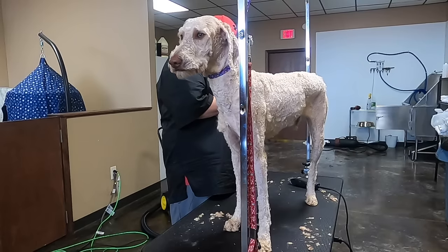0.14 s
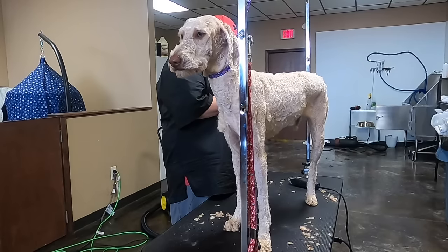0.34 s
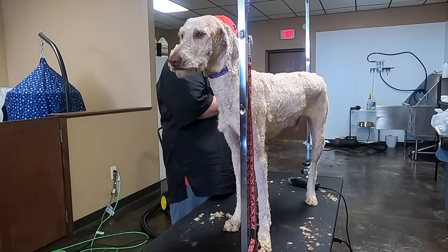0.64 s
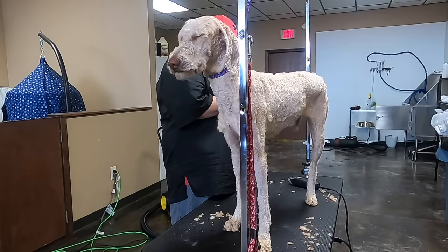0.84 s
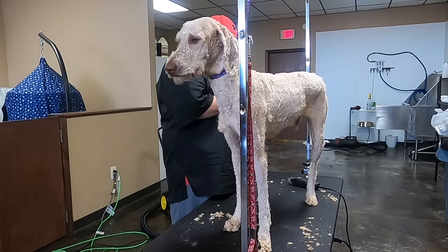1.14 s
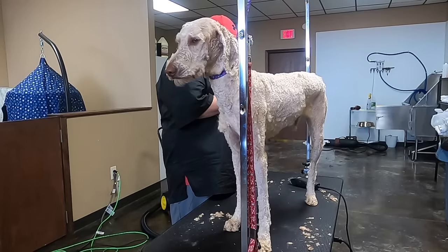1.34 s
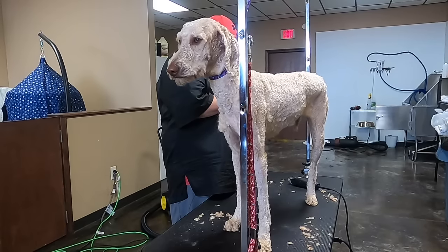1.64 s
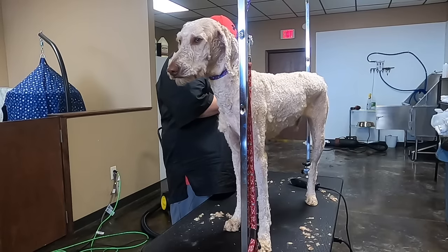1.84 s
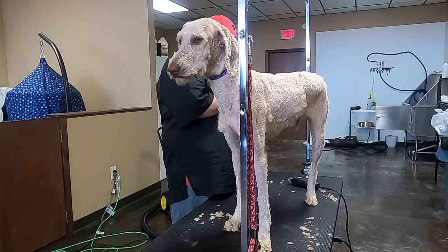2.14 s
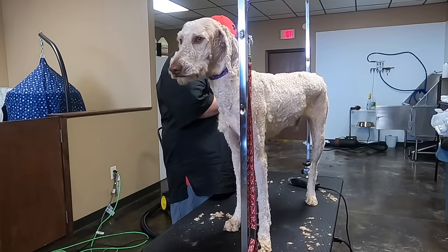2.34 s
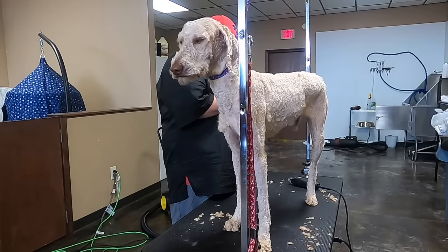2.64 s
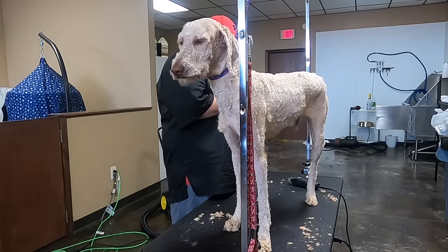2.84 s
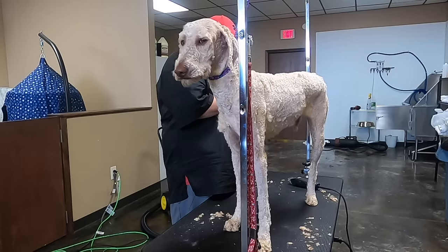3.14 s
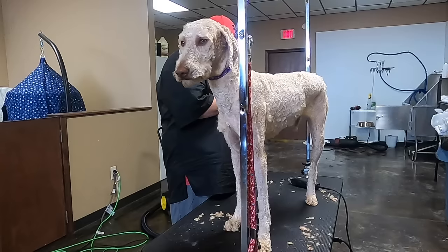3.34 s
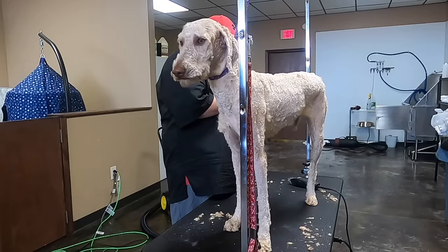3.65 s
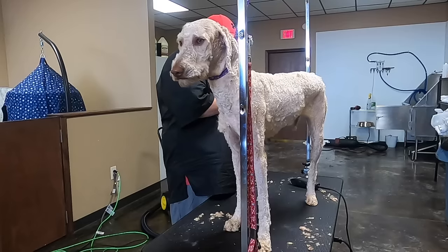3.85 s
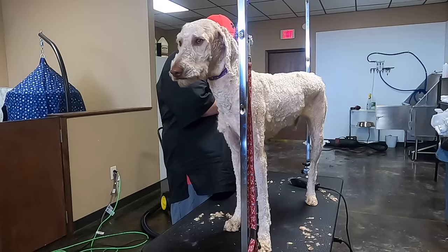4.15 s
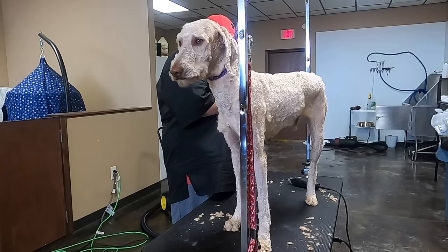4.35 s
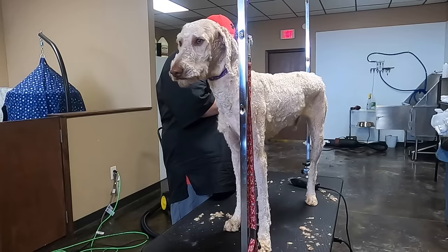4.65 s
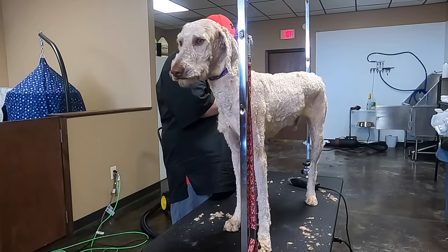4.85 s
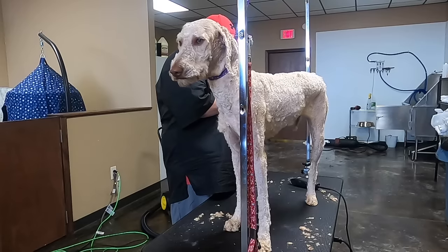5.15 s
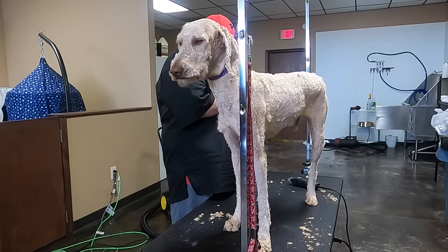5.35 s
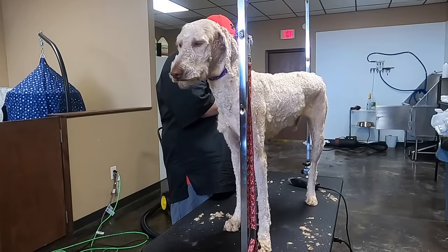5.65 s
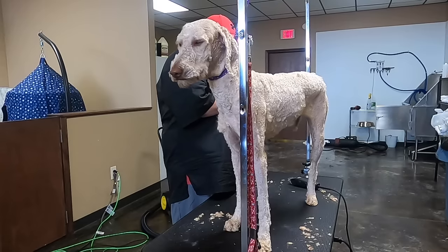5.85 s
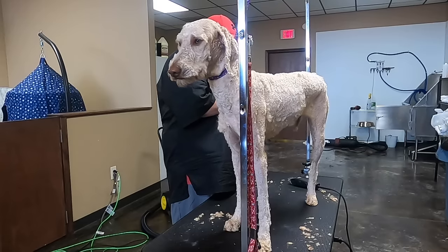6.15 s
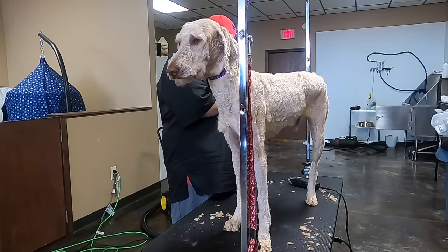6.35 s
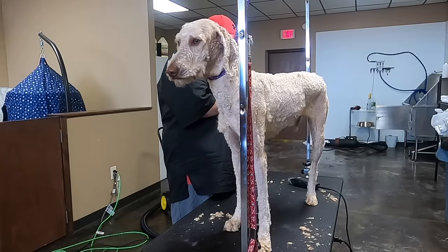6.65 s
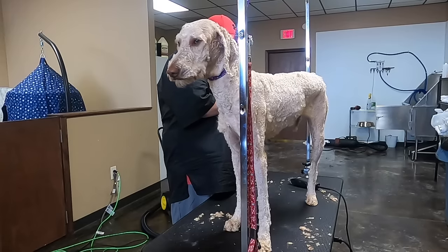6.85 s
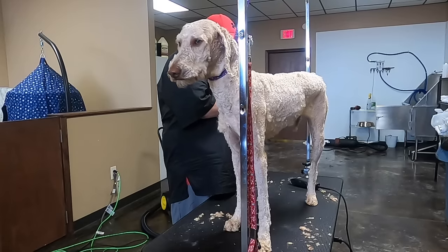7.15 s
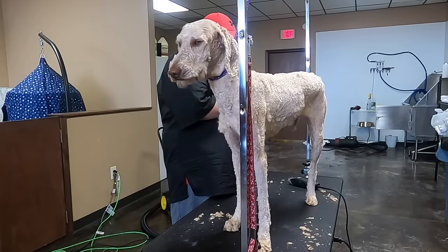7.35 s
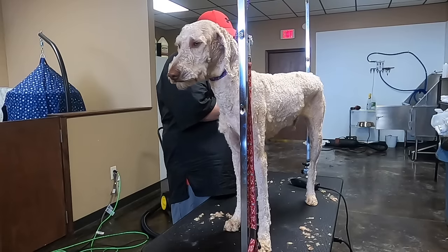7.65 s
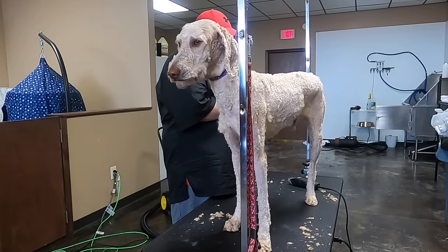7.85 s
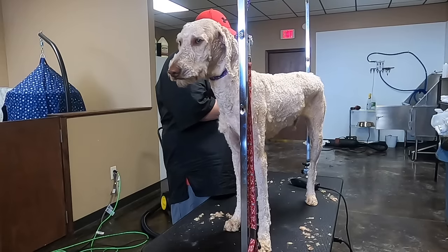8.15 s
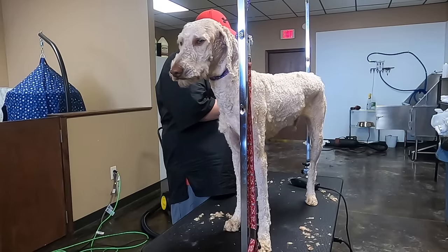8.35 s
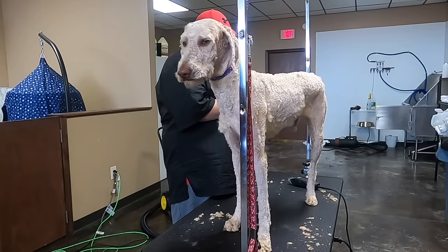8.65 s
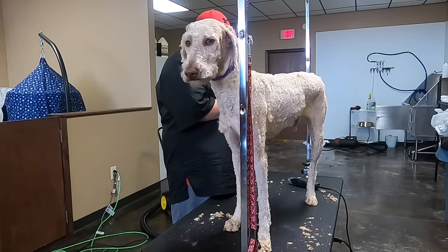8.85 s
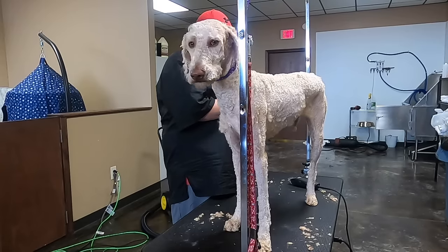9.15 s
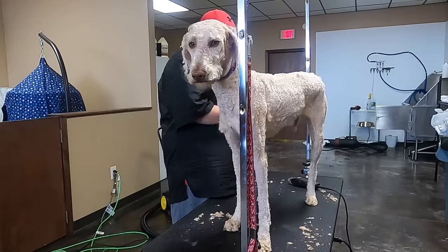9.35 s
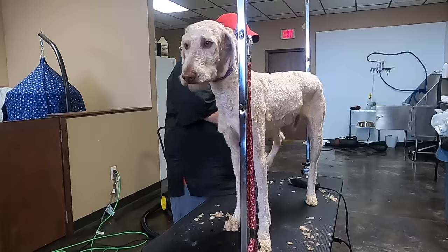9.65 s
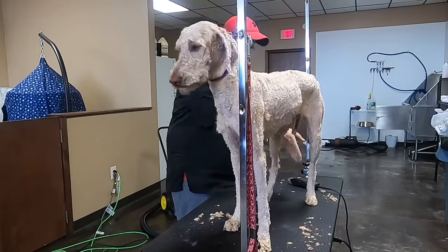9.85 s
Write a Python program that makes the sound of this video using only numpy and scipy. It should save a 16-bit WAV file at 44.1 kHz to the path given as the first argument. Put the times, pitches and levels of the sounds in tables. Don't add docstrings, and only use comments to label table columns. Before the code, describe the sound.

In a hard-floored grooming room, a low ventilation rumble and mains hum throb steadily. A few metres from the stereo microphone, steel clippers cut a dog's nails: tiny creaks, then a sharp crack with short metallic ring, a soft table thud and brief room echo. Six snips come at uneven gaps, one much softer. Small latch ticks fall between them, and sleeve and fur rustle near the end.

```python
import sys
import numpy as np
from scipy import signal
from scipy.io import wavfile
from scipy.ndimage import uniform_filter1d

SR = 44100
rng = np.random.default_rng(int(sys.argv[2]) if len(sys.argv) > 2 else 0)


def dump(signal):
    limited = np.clip(np.atleast_2d(signal).T, -1, 1)
    pcm = np.round(limited * 32767).astype(np.int16)
    wavfile.write(sys.argv[1], SR, pcm)


def boost(x):
    u = np.asarray(x, float) / 20
    return 10 ** u


N = 441000

# (frequency [Hz], density [dB per Hz])
RUMBLE_COLOUR = [(18, -17.5), (27, -0.5), (36, -1), (50, -7), (64, -4.5), (80, -11.5), (100, -11.5),
                 (140, -13.5), (185, -4.5), (212, -10.5), (232, -5.5), (246, -8.5), (262, -8.5),
                 (310, -9.5)]
# (frequency [Hz], density [dB per Hz])
AIR_COLOUR = [(180, -34), (310, -1), (364, -7.5), (420, -14.5), (458, -10), (620, -25), (722, -22),
              (817, -27), (1030, -24.5), (1120, -23.5), (1630, -29.5), (3000, -43.5), (3900, -74),
              (6600, -120)]
# (frequency [Hz], density [dB per Hz])
HISS_COLOUR = [(1500, -7.5), (3000, 4), (5000, -2.5), (8000, -7), (8500, -13.5), (11000, -19),
               (13200, -17.5), (13600, -37.5), (16000, -32.5)]
RUMBLE_DB, AIR_DB, HISS_DB = -52, -59, -81

# (base frequency [Hz], moment it meets the mains phase [s])
MAINS = (120.025, 0)
COMPRESSOR = (59.05, .322)
FAN = (128.675, .339)
MAINS_HZ = 120.025
MAINS_ORDERS = [1, 2, 3]
COMPRESSOR_ORDERS = [1, 2, 4, 6, 9, 10, 11, 12]
FAN_ORDERS = [1, 2]
MAINS_DB = [-54.5, -65.5, -78.5]
COMPRESSOR_DB = [-58.5, -57, -78, -80, -85, -78, -80, -81.5]
FAN_DB = [-58, -71]
FAR_HZ = [107.78, 96.5, 160.83]
FAR_DB = [-67.5, -82, -83]
# (frequency [Hz], width [Hz], rms level [dB])
WAVERING = [(194.7, 0.28, -59), (689, 16, -94), (1660, 14, -86), (8050, 10, -108), (13216, 32, -118)]

# (start [s], length [s], level [dB], centre [Hz])
RUBS = [
    (1.627, 0.1, -70.5, 1700),
    (2.444, 0.5, -79, 4300),
    (4.248, 0.23, -71.5, 1450),
    (7.06, .14, -79.5, 5000),
    (9.347, 0.16, -66.5, 1600),
    (9.45, 0.46, -68, 1600),
    (9.719, .45, -58.5, 2400),
]
RUB_RISE, RUB_ENDS_DB = .35, -8
# (time [s], level [dB], centre [Hz], length [s])
CRUMPLES = [(1.655, -72.5, 2980, 0.017), (4.284, -71.5, 2500, 0.058), (9.766, -62, 3500, 0.0045),
            (9.775, -58, 3000, .008), (9.784, -52.5, 3200, .006), (9.846, -50, 2300, .014),
            (9.862, -50, 2010, 0.007), (9.873, -49.5, 2470, .02), (9.898, -57, 3400, 0.0098),
            (9.906, -60, 6000, 0.021), (9.914, -49.5, 3000, .012), (9.925, -49.5, 2056, 0.019),
            (9.963, -52, 1680, 0.014), (9.971, -53.5, 1100, .01), (9.997, -62, 7000, .01)]
# (frequency [Hz], gain [dB])
CLOTH_DULLING = [(4000, 1.5), (8000, -5), (11000, -10.5), (16000, -20)]

# (time [s], peak [dB], pitch [Hz], ring [dB], brightness [dB])
TICKS = [(0.2134, -57, 2050, -5, -8), (1.7408, -57.5, 2500, -4, -14), (4.0444, -69, 1730, -6, 10),
         (4.1063, -49, 2100, -6, -6), (4.6638, -58, 1610, -8, -5), (5.9678, -37.5, 1750, -4, -0.5),
         (6.108, -50.5, 2650, -7.5, -1), (7.1734, -60, 1525, -12.5, 5), (7.2913, -39.5, 1500, -7.5, -8),
         (9.3811, -49, 1880, -17, -1), (9.5013, -59, 1730, 2, 9), (9.816, -45, 2000, -7, -10),
         (9.8723, -36, 2660, -8, -16)]
# (time [s], peak [dB], pitch [Hz], ring [dB],
# brightness [dB])
BITE_PINGS = [
    (6.534, -69, 7860, 3, 6),
    (6.541, -50, 8000, -8, 11),
    (6.551, -71, 7700, -1, 6),
]
# (frequency [Hz], gain [dB])
TICK_COLOUR = [(700, -28.5), (1300, -1.5), (2500, -2.5), (4500, -1.5), (6500, -4), (8200, -8.5),
               (10000, -20), (13000, -35.5), (16000, -52)]

# (time [s], peak [dB], handle ring [dB], jaw ring [dB], blade crack [dB])
SNIPS = [
    (1.1476, -24.5, -3.5, -9, 2.5),
    (2.361, -41.5, -19, -33, -25),
    (3.402, -27, -5, -11.5, -2.5),
    (5.3156, -24, -7, -13.5, -2),
    (6.6164, -25, -5.5, -11, 4),
    (8.929, -23, -0.5, -12.5, -1),
]
# (time [s], peak [dB], handle ring [dB], jaw ring [dB])
BITES = [(1.121, -60, -11, -11), (1.127, -45.5, -5, -16), (2.328, -65, -3, -5), (2.334, -65, -8, -15),
         (2.349, -50, -5, -9), (2.356, -55, 2.5, 0.5), (3.351, -59, -7.5, -13.5), (3.357, -63, -2.5, -14.5),
         (3.38, -49.5, -5, -14), (3.394, -49, 0, -7), (5.27, -61.5, -10.5, -2), (5.304, -59, -3, -9),
         (6.587, -53, -8, -14), (6.597, -64, 6, -20), (8.876, -71, -8, -5), (8.913, -54.5, -3, -8),
         (8.918, -54, -7, -12), (8.9253, -31, -9, -8)]
BITE_BLADE_DB = -3.5
# (frequency [Hz], gain [dB])
NAIL_CRACK = [(500, -40.5), (900, -26.5), (1400, -11.5), (1900, -3), (2700, -3.5), (3600, 2.5), (4700, -1),
              (5800, -4.5), (7000, -8), (9500, -21), (12300, -27.5), (15000, -42), (16500, -50.5)]
# (frequency [Hz], t60 [s], level [dB])
HANDLE = [(1620, .013, -3.5), (1850, .017, 0), (2150, .013, -8)]
JAW = [(3350, .014, 0), (3620, .015, -3)]
BLADE = [(2250, .012, -9), (5550, .01, -9)]
TABLE = [(309.6, 0.046, 3), (520, 0.026, 7.5), (700, 0.036, -3), (906, 0.023, -2)]
THUD_DB, THUD_FOLLOWS = -34.5, .6

# (delay [s], left level [dB], right level [dB])
EARLY = [(.0046, -5, -5), (.0063, -6, -6), (.0115, -9, -10), (.0168, -8, -8), (.021, -11, -11),
         (.034, -11, -12)]
# (frequency [Hz], t60 [s])
ROOM_T60 = [(250, 0.25), (500, 0.53), (900, 0.41), (1800, 0.37), (3600, 0.5), (5600, 0.49), (8000, 0.38),
            (12000, 0.31)]
# (frequency [Hz], gain [dB])
ROOM_COLOUR = [(300, -2.5), (1000, 3), (2000, 0), (4000, 1.5), (8000, 4), (14000, -6)]
# (frequency [Hz], correlation [1])
NOISE_LIKENESS = [(25, .96), (60, .96), (130, .97), (290, .94), (640, .8), (1410, .55), (3100, .25),
                  (6800, 0)]
# (frequency [Hz], correlation [1])
ECHO_LIKENESS = [(300, 0.92), (1000, 0.54), (2000, 0.74), (4000, 0.12), (8000, 0.11)]
# (frequency [Hz], difference [dB])
LEAN = [(1000, -.5), (2500, 1), (5000, -.5), (8000, -4.5), (11000, -4.5), (14000, -2.5)]
LAG_S = 2 / 44100


def evened(x):
    return x / np.sqrt(np.mean(x ** 2) + 1e-20)


def read(points, hz):
    f, value = np.transpose(points)
    return np.interp(np.log(hz + 1), np.log(f + 1), value)


def add(mix, s, sound):
    part = mix[int(round(s * SR)):][:len(sound)]
    part += sound[:len(part)]


def resonate(x, hz, width):
    turn = np.exp(2j * np.pi * np.cumsum(hz * np.ones(len(x))) / SR)
    r = np.exp(-np.pi * width / SR)
    smoothed = signal.lfilter([1 - r], [1, -r], x / turn)
    return 2 * (turn * smoothed).real


def click(gain_db):
    hz = abs(np.fft.fftfreq(1024, 1 / SR))
    level = np.log(boost(np.maximum(gain_db(hz), -100)))
    return np.fft.ifft(np.exp(np.conj(signal.hilbert(level)))).real[:512]


def ports(left, other, hz, likeness):
    same = np.clip(read(likeness, hz), 0, 1)[:, None]
    late = np.exp(-2j * np.pi * hz * LAG_S)[:, None]
    right = same * left + np.sqrt(1 - same ** 2) * other
    return np.array([left * late, right])


def wash(shape, size, top_hz, patchy_db):
    hz = np.arange(0, top_hz, SR / size)
    a, b, c, d, patches = rng.standard_normal((N * 4 // size + 5, len(hz), 5)).T
    patches = uniform_filter1d(patches, size=6, axis=0)
    patches = evened(uniform_filter1d(patches, size=6, axis=1))
    z = ports(a + 1j * b, c + 1j * d, hz, NOISE_LIKENESS)
    z = z * boost(shape(hz)[:, None] + patchy_db * patches)
    z = np.pad(z, ((0, 0), (0, size // 2 + 1 - len(hz)), (0, 0)))
    noise = signal.istft(z, nperseg=size, noverlap=size * 3 // 4)[1]
    return evened(noise[:, :N])


def background_noise():
    edge = RUMBLE_COLOUR[-1][0]
    rumble = wash(lambda hz: read(RUMBLE_COLOUR, hz) - 90 * (hz < 14), size=4096, top_hz=edge, patchy_db=2.5)
    air = wash(lambda hz: read(AIR_COLOUR, hz) - 90 * (hz <= edge), size=2048, top_hz=3014, patchy_db=1.84)
    hiss = wash(lambda hz: read(HISS_COLOUR, hz) - 90 * (hz < 1500), size=1024, top_hz=15430, patchy_db=1.3)
    return boost(RUMBLE_DB) * rumble + boost(AIR_DB) * air + boost(HISS_DB) * hiss


def machines():
    t = np.arange(N) / SR
    apart = np.array([[-.11], [.11]])
    hum = np.zeros((2, N))
    for hz, db in zip(FAR_HZ, FAR_DB):
        hum += boost(db) * np.cos(2 * np.pi * (hz * t + rng.random()) + apart)
    for (base, s), orders, levels in [(MAINS, MAINS_ORDERS, MAINS_DB),
                                      (COMPRESSOR, COMPRESSOR_ORDERS, COMPRESSOR_DB),
                                      (FAN, FAN_ORDERS, FAN_DB)]:
        for k, db in zip(orders, levels):
            free_phase = rng.random() * (db < max(levels))
            turns = k * base * (t - s) + MAINS_HZ * s + free_phase
            hum += boost(db) * np.cos(2 * np.pi * turns + apart)
    wavering = np.zeros(N)
    for hz, width, db in WAVERING:
        wavering += boost(db) * evened(resonate(rng.standard_normal(N), hz, width))
    return np.sqrt(2) * hum + wavering


def slips(count, hz, width):
    u, e, sign = rng.random((count, 3)).T
    happens = u < 4500 / SR
    grains = happens * boost(-3.5 * np.log(e + .005)) * np.sign(sign - .5)
    return evened(resonate(resonate(grains, hz, width), hz, width))


def cloth():
    out = np.zeros(N)
    for s, length_s, db, hz in RUBS:
        u = np.arange(0, 1, 1 / (length_s * SR))
        rub = slips(len(u), hz, 2600) + boost(-5.5) * slips(len(u), 6000, 3500)
        swell_db = np.interp(u, [0, RUB_RISE, 1], [RUB_ENDS_DB, 0, RUB_ENDS_DB])
        add(out, s, boost(db + swell_db - 4.0) * rub * signal.windows.tukey(len(u), .2))
    t = np.arange(4096) / SR
    for s, db, hz, length_s in CRUMPLES:
        burst = (1 - np.exp(-t / 0.0011)) * np.exp(-(t / length_s) ** 2)
        add(out, s, boost(db) * slips(len(t), hz, hz) * burst)
    return out


def ring(modes, detune, rise_s, size=2048):
    t = np.arange(size) / SR
    rings = np.zeros(size)
    for (hz, t60, db), d in zip(modes, detune):
        rings += boost(db - 60 * t / t60) * np.sin(2 * np.pi * hz * d * t)
    return rings * (1 - np.exp(-t / rise_s))


def crack(colour, parts, echo_s, second):
    pulse = click(lambda hz: read(colour, hz) + read(parts, hz))
    pulse = pulse + second * np.roll(pulse, int(echo_s * SR * rng.uniform(.5, 1.5)))
    return pulse / abs(pulse).max()


def latch():
    clicks, rings = np.zeros((2, N))
    for s, db, hz, ring_db, bright_db in TICKS + BITE_PINGS:
        tilt = [(2000, 0), (7000, bright_db), (13000, 2 * bright_db)]
        add(clicks, s, boost(db) * crack(TICK_COLOUR, tilt, echo_s=.0008, second=.33))
        add(rings, s, boost(db + ring_db) * ring([(hz, .012, 3)], [1], 0.00057))
    return clicks + boost(-9) * rings, rings


def clippers():
    cracks, rings = np.zeros((2, N))
    for s, db, handle_db, jaw_db, blade_db in SNIPS + [(*bite, BITE_BLADE_DB) for bite in BITES]:
        detune = 1 + .01 * rng.standard_normal((3, 3))
        parts = [(1900, handle_db / 2), (3700, jaw_db / 2), (6000, blade_db / 2), (12000, blade_db)]
        add(cracks, s, boost(db + 2.5) * crack(NAIL_CRACK, parts, echo_s=.001, second=0.34))
        add(rings, s, boost(db + blade_db / 2) * ring(BLADE, detune[2], 0.0004))
        add(rings, s, boost(db + handle_db + 6.5) * ring(HANDLE, detune[0], 0.00062))
        add(rings, s, boost(db + jaw_db + 12.0) * ring(JAW, detune[1], 0.0008))
    for s, db, *_ in SNIPS:
        detune = 1 + 0.013 * rng.standard_normal(len(TABLE))
        thud = ring(TABLE, detune, 0.0015, size=5000)
        add(rings, s + .004, boost(THUD_DB + THUD_FOLLOWS * (db + 25.5)) * thud)
    return cracks, rings


def room(x, tail_db, early_db, direct_db=0):
    taps = np.zeros((2, 32000))
    at = np.arange(40, 31000, 20) + rng.integers(0, 20, (2, 1548))
    np.put_along_axis(taps, at, rng.choice([-1., 1.], at.shape), axis=1)
    hz, t, z = signal.stft(taps, SR, nperseg=256)
    decay_db = -60 * t / read(ROOM_T60, hz)[:, None]
    z = ports(*z, hz, ECHO_LIKENESS) * boost(read(ROOM_COLOUR, hz)[:, None] + decay_db)
    tail = signal.istft(z, SR, nperseg=256)[1]
    tail *= np.clip(np.arange(tail.shape[1]) / SR / 0.0038, 0, 1)
    tail *= boost(tail_db) / np.linalg.norm(tail[1])
    tail[[0, 1], [1, 0]] += boost(direct_db)
    for s, left_db, right_db in EARLY:
        tail[[0, 1], int(s * SR) + rng.integers(0, 4, 2)] += boost(early_db + np.array([left_db, right_db]))
    shade = [click(lambda hz: side * read(LEAN, hz)) for side in (.5, -.5)]
    response = signal.oaconvolve(tail, shade, axes=1)
    return signal.oaconvolve(x[None], response, axes=1)[:, :N]


def scene():
    cracks, rings = clippers()
    clicks, tinks = latch()
    beamed = room(rings, tail_db=-2.5, early_db=-2.5)
    ticks = room(clicks, tail_db=.6, early_db=-4) + tinks
    rustle = signal.oaconvolve(cloth(), click(lambda hz: read(CLOTH_DULLING, hz)))[:N]
    tool = room(cracks, tail_db=11.0, early_db=7.0, direct_db=0.5) + beamed + ticks
    return tool + room(rustle, tail_db=-6, early_db=-15.0) + background_noise() + machines()


def band_limit(x):
    return signal.sosfilt(signal.butter(12, 15620, fs=SR, output="sos"), x)


def record(dry):
    return band_limit(dry)


dry = scene()
out = record(dry)
dump(out)
```